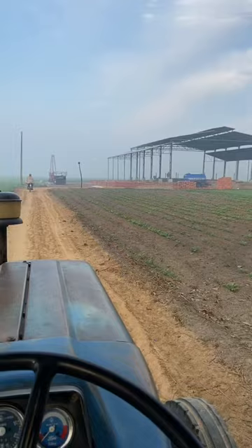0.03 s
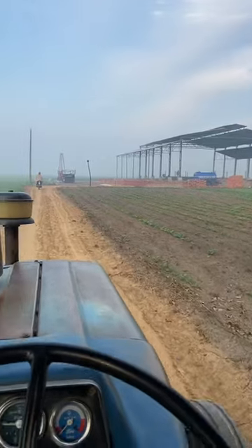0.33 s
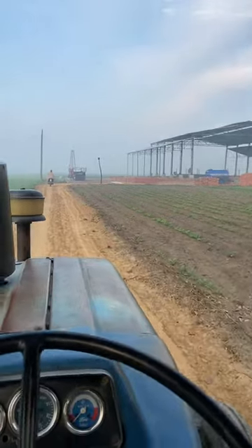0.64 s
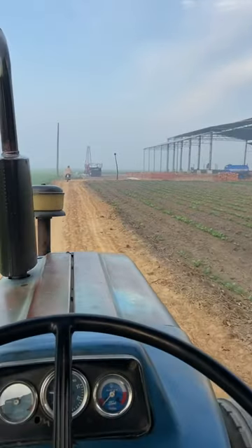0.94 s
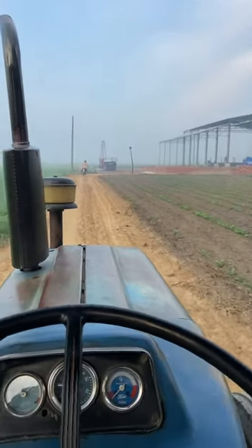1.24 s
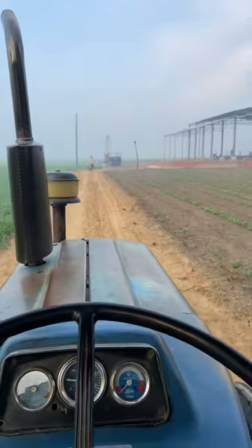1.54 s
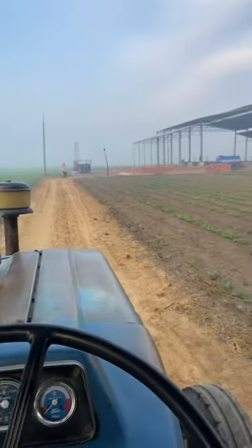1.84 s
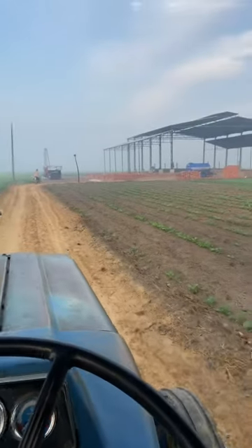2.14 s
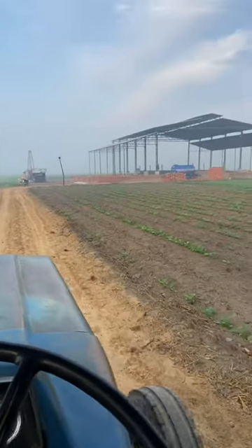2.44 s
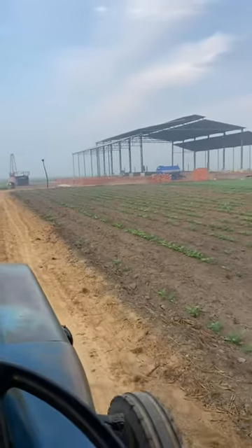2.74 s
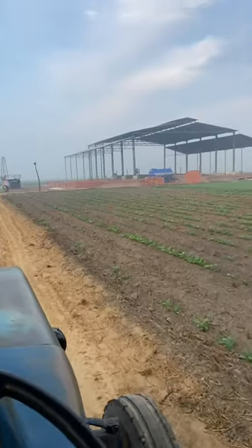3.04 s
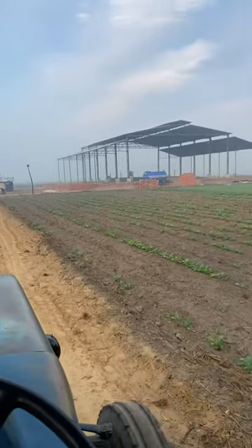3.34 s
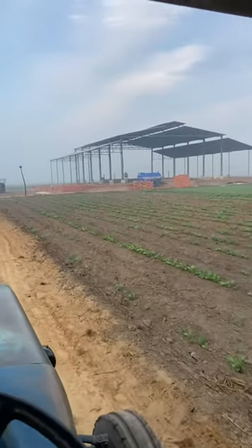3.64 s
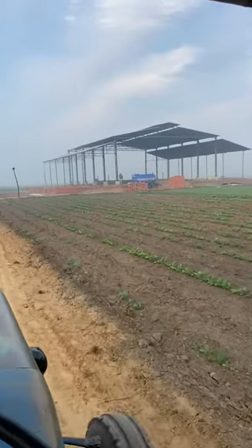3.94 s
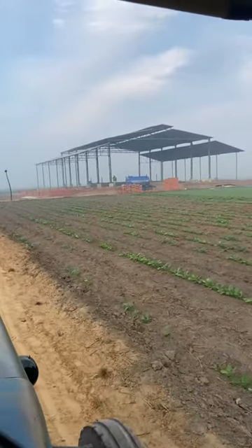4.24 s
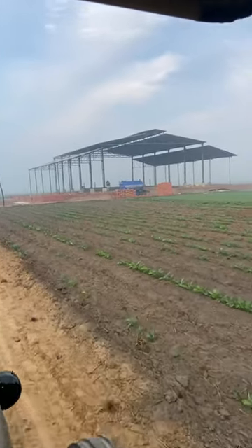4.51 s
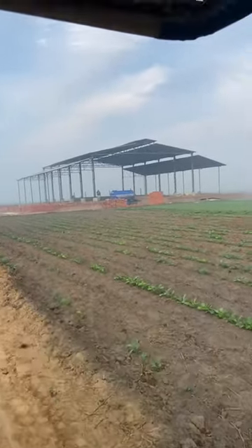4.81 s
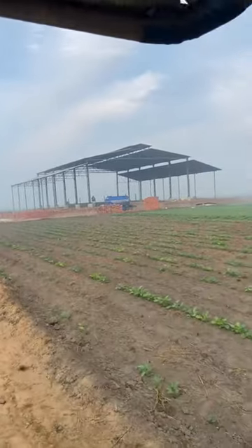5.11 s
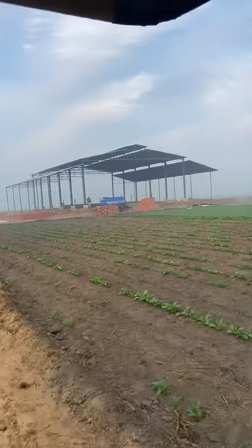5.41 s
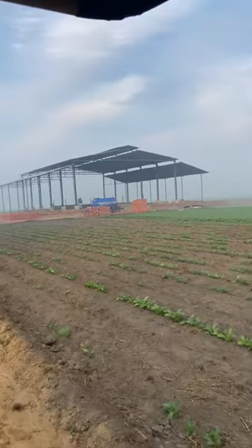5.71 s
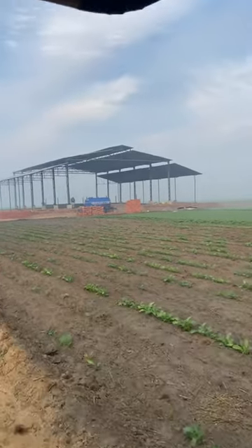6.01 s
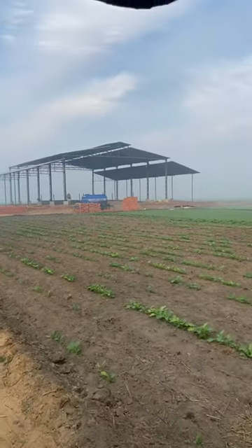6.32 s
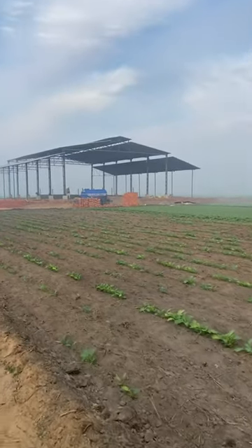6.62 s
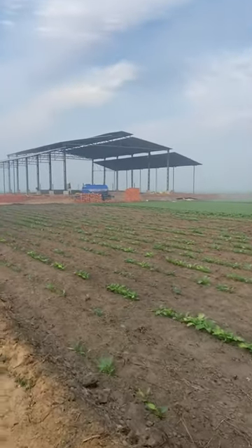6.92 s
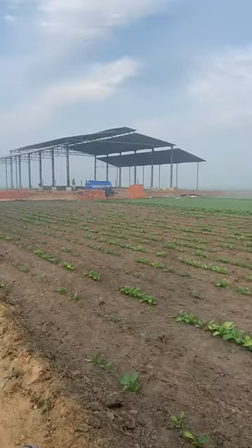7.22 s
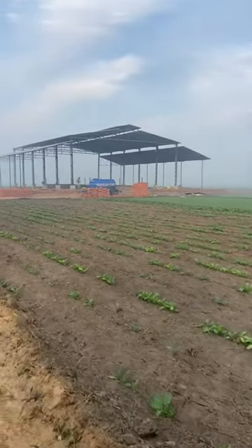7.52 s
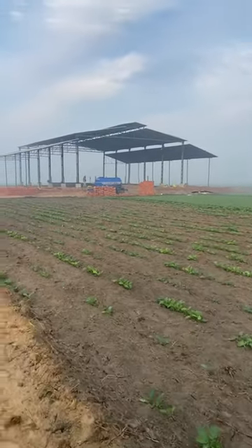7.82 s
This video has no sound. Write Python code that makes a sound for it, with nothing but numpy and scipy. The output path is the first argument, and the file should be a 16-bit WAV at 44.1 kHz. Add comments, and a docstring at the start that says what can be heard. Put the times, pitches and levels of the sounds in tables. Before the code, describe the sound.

A diesel tractor engine runs from start to finish, heard close up from the driver's seat. It holds a nearly constant speed, about twenty beats a second, with deep exhaust thumps, hard knocking and a low rumble from the bonnet and gearbox. Loose steel rattles and rings with the beats, and single knocks stand out. The bonnet booms a little more around 0.5 and 1.2 seconds, and a faint gear hum swells near 1.4 and 2.5 seconds. A dry joint squeaks faintly between 2 and 3 seconds. From about 3 to 5.5 seconds the tone gradually shifts: the rumble eases slightly, while sheet-metal chatter and a low throb come forward. More short, faint squeaks follow from about 6 to 7.5 seconds. Tiny high clinks of loose parts are scattered throughout, more often in the last two seconds.

```python
"""The thump and clatter of a three-cylinder diesel tractor at about 810 rpm, from the driver's seat.
Each firing is an impulse that excites resonators: the exhaust stack thumps, the block knocks and loose
steel rattles, while bonnet and gearbox rumble underneath. It hits harder under load, and single
firings stand out. Small parts clink and a dry joint squeaks now and then. The balance shifts as the
microphone slowly turns from the bonnet to the field."""
import sys
import numpy as np
from scipy import signal
from scipy.fft import rfft, irfft, next_fast_len
from scipy.io import wavfile
from scipy.ndimage import uniform_filter1d

SR = 44100
rng = np.random.default_rng(int(sys.argv[2]) if len(sys.argv) > 2 else 0)


def wav_record(signal):
    """Record a signal, one row per channel, as 16-bit PCM in the file named by sys.argv[1]."""
    frames = np.transpose(np.atleast_2d(signal))
    bounded = np.clip(frames, -1, 1)
    # unit amplitude maps onto the largest positive 16-bit level
    quanta = np.round(bounded * 32767).astype(np.int16)
    wavfile.write(sys.argv[1], SR, quanta)


N = 346626
TIME = np.arange(N) / SR
FFT_SIZE = next_fast_len(N + SR // 2, real=True) // 2 * 2
HZ = np.arange(FFT_SIZE // 2 + 1) * SR / FFT_SIZE
CYLINDERS = 3

# engine speed: (time [s], firing rate [1/s])
FIRING_RATE = [(0, 19.86), (.82, 20.35), (2.26, 20.23), (3.42, 19.86), (3.69, 20.36), (5.06, 20.55),
               (5.7, 20.16), (6.72, 19.87), (7.86, 20.26)]
# narrow resonances of the block: (frequency [Hz], bandwidth [Hz], level re the broad spectrum [dB])
BLOCK_RESONANCES = [(566, 18, -7), (748, 20, -2), (786, 16, -4), (910, 22, -5), (1005, 20, -8),
                    (1238, 18, -8), (1303, 30, -8), (1463, 12, 2), (1600, 16, -2), (2158, 27, -3),
                    (2289, 34, -3), (2799, 50, -8), (3700, 50, -6), (4037, 45, -2), (4916, 45, -2),
                    (5480, 55, -3)]


def firings(shared_db=.5, own_db=.6, skip_s=6.3, skip_rows=3):
    """Quasi-periodic excitation: the firing times, and the knock, rattle and clank level of each."""
    # two engine cycles, a row per firing: (knock [dB], rattle [dB], clank [dB])
    pattern = [(1, 2.45, 8), (-0.8, -2.4, -24), (0, 0.5, 0), (-3.5, -1, 1), (-4.5, -3, -22), (0.9, 1, 3.5)]
    # firings that knock or rattle louder: (time [s], extra knock and clank [dB], extra rattle [dB])
    hard_knocks = [(0.1, 3.0, 5.0), (0.15, 5.0, 5.5), (0.2, 2.5, 5.5), (0.55, 2.0, 1.5), (0.6, 2.5, 3.0),
                   (1.19, 3.0, 0.0), (1.48, 3.5, 0.0), (1.78, 1.5, 1.0), (1.88, 0.5, 2.5), (2.08, 1.5, 2.5),
                   (2.13, 2.5, 1.0), (2.18, 2.5, 1.5), (2.27, -1.0, 3.5), (2.32, 1.0, 2.5),
                   (2.52, 4.0, 5.0), (2.62, 2.0, 3.5), (2.77, 2.5, 2.5), (2.87, 4.0, 0.5), (3.02, 4.0, 2.5),
                   (3.17, -2.0, 3.0), (3.22, 3.5, 2.5), (3.32, 4.5, 3.0), (3.42, 0.0, 5.0),
                   (3.57, 1.0, 3.0), (3.87, 2.5, -1.0), (3.97, 1.0, 3.0), (4.01, 2.5, 1.0),
                   (4.26, 2.5, -2.0), (4.36, 4.0, 3.5), (4.75, -1.5, 3.5), (5.14, 2.0, 1.0),
                   (5.19, 2.0, 0.0), (5.33, 3.0, 2.5), (5.98, 2.5, 3.0), (6.18, 3.0, 3.0), (6.33, 2.0, 2.5),
                   (6.58, 2.5, 0.0), (6.68, 2.0, 2.5), (6.73, 2.5, 3.5), (6.98, 0.0, 5.0), (7.23, 2.0, 0.5),
                   (7.28, 1.5, 2.0), (7.53, 4.5, 0.0)]
    fired = np.cumsum(curve(FIRING_RATE)) / SR
    number = np.arange(1, int(fired[-1]) + 1)
    times = np.interp(number, fired, TIME)
    row = (number + skip_rows * (times > skip_s)) % len(pattern)  # the accents skip ahead once
    chance = rng.standard_normal((len(times), 3))
    extra_db = shared_db * chance[:, :1] + own_db * chance[:, 1:]
    for s, knock_db, rattle_db in hard_knocks:
        extra_db[np.argmin(abs(times - s))] = knock_db, rattle_db
    low_db, high_db = extra_db.T
    blow_db, jolt_db, clank_db = np.array(pattern)[row].T
    return times, blow_db + low_db, jolt_db + high_db, clank_db + low_db


def exhaust(times, spread_db=1.03, early_s=.0012, cutoff_hz=28):
    """Pipe resonance: each gas puff rings the stack, too narrow to radiate the firing rate well."""
    # response of the stack: (frequency [Hz], level [dB])
    stack = [(20, -24), (30, -14.5), (40, -10), (61, -0.5), (81, 0.5), (101, -13), (121, -13.5), (160, -18),
             (250, -21), (450, -31.5), (900, -49), (6000, -110)]
    puffs = pulses(times - early_s, spread_db * rng.standard_normal(len(times)))
    radiation = 1 / (1 + (cutoff_hz / (HZ + 1)) ** 6)
    return unit(through(puffs, response(stack) * radiation))


def rumble(times, shake_db=-3, decay_s=.072, surge_db=-1):
    """Forced vibration: each cylinder shakes the bonnet its own way, over churning gears and tyres."""
    # response of bonnet and gearbox: (frequency [Hz], level [dB])
    body = [(22, -63), (36, -29), (55, -3), (75, -2), (110, 2.5), (195, 1), (230, -4), (275, -1.5),
            (330, -4), (420, -4), (590, -7), (680, -16), (1200, -25), (4000, -70)]
    t = TIME[:SR // 10]
    shakes = 0
    for cylinder in range(CYLINDERS):
        own_times = times[cylinder::CYLINDERS]
        shake = rng.standard_normal((2, len(t))) * np.exp(-t / decay_s)
        kicks = pulses(own_times, rng.standard_normal(len(own_times)))
        shakes = shakes + signal.fftconvolve(kicks[None], shake)[:, :N]
    # the churn surges as the power stroke takes up the slack in the gears
    surge = bursts(times + .017, np.full(len(times), surge_db), rise_s=.006, decay_s=.008)
    churn = np.hypot(1, surge) * impacts(3000, .77)
    # everything slackens during the compression just before a firing
    slack = 1 - .6 * bursts(times - .013, np.zeros(len(times)), rise_s=.005, decay_s=.008)
    force = slack * (undb(shake_db) * unit(shakes) + churn)
    return unit(through(force, response(body, BLOCK_RESONANCES)))


def knock(times, db, slap_db=-1.5, valve_db=-7, gears_db=-3.8):
    """Structure-borne sound: combustion, piston slap, valves and timing gears strike the block."""
    # response of the block: (frequency [Hz], level [dB])
    block = [(120, -21.5), (300, 6.5), (560, -0.5), (660, 5), (780, 3), (950, 2), (1400, 0), (1850, -0.5),
             (2400, -3), (3300, -13), (4500, -12), (9000, -39.5)]
    blow = bursts(times - .0055, db, rise_s=.0068, decay_s=.012)
    slap = bursts(times + .009, db + slap_db, rise_s=.003, decay_s=.006)
    seating_db = valve_db + db + 2 * rng.standard_normal(len(times))
    valve = bursts(times + .021, seating_db, rise_s=.002, decay_s=.014)
    envelope = np.sqrt(blow ** 2 + slap ** 2 + valve ** 2 + undb(gears_db) ** 2)  # powers add
    force = envelope * cyclic_impacts(times, per_s=26000, share=.35)
    return unit(through(force, response(block, BLOCK_RESONANCES)))


def ring(times, db):
    """Free vibration: the block rings after each blow, with a mix of modes set by where it is struck."""
    # block modes: (frequency [Hz], bandwidth [Hz], level for cylinder 1, 2, 3 [dB])
    block_modes = [(374.5, 25.5, -3, -7, 8), (448, 11.8, -1, -6, 2.5), (512, 24, 1, -3, -3),
                   (594, 22, -3.5, -5, 0.5), (752.4, 22.6, 1.5, -8, 4), (777, 21, 1, -7, -7.5),
                   (840, 25, -11, 0.5, -1), (912.5, 13.4, 0.5, -17, -15), (1004.6, 17.6, -4.5, -7, -0.5),
                   (1067, 16.4, -3, -16, -3), (1182, 13, -8, -8, -2), (1244, 12.7, -0.5, -12, -7.5),
                   (1307, 15.7, -1, -9, -6), (1391, 17.3, 3, -9, -3.5), (1480, 18, 3.5, -5.5, -5.5),
                   (1596, 26, -1.5, -7, -3), (1885, 34, -6, 2, -0.5), (2165, 19, -24, 3, -6),
                   (2323, 27, -20, -7, 2.5)]
    return struck(times - .001, db, block_modes, rise_s=.0072, spread_db=2, spread_rad=.5)


def boom(times, hz=272, width_hz=70):
    """Panel resonance: the bonnet booms in the wake of each exhaust puff."""
    envelope = bursts(times + .012, np.zeros(len(times)), rise_s=.004, decay_s=.014)
    force = envelope * impacts(3000, 1.2)
    return unit(through(force, modes([(hz, width_hz, 0)]) ** 2))


def rattle(times, db, tick_db=-5, tappet_db=-9, chatter_db=-13):
    """Impact noise: injectors tick, jolted steel buzzes and one slack tappet clicks once a cycle."""
    # response of the loose steel: (frequency [Hz], level [dB])
    steel = [(800, -18), (2500, -7.5), (3400, -4.5), (3950, -4), (4300, -5.5), (5000, -1.5), (5900, -3.5),
             (6600, -6.5), (8000, -6), (9600, -7), (11000, -10), (13500, -10), (15500, -54)]
    times = times + .0005 * rng.standard_normal(len(times))
    jolt = bursts(times - .006, db, rise_s=.006, decay_s=.019)
    tick = bursts(times - .0045, tick_db + .5 * db, rise_s=.0015, decay_s=.006)
    click_times = times[::CYLINDERS] + .025
    click_db = tappet_db + 2 * rng.standard_normal(len(click_times))
    tappet = bursts(click_times, click_db, rise_s=.0059, decay_s=.018)
    chatter = np.sqrt(tick ** 2 + tappet ** 2 + undb(chatter_db) ** 2) * impacts(14000, .54)
    shaken = jolt * cyclic_impacts(times, per_s=15000, share=.2)
    buzz = through(shaken, lowpass(8500))  # the heavier parts carry less of the top octave
    return unit(through(buzz + chatter, response(steel, BLOCK_RESONANCES)))


def ping(times, db):
    """Free vibration: thin steel parts ring with every jolt, never quite the same way twice."""
    # thin steel modes: (frequency [Hz], bandwidth [Hz], level for cylinder 1, 2, 3 [dB])
    steel_modes = [(2810, 37, -3, -18, -1), (3750, 42, -7, -5, 3.5), (4037, 32, 1, -4, -2),
                   (4530, 47, -4, 7, -9), (4940, 26, 5, -6, -8), (5110, 52, 3, -9, -6),
                   (5220, 52, 2, -3, -3), (5270, 60, 1, -7, -3.5), (5500, 38, 1, -8, -6),
                   (5760, 37, 4, -13, -13), (6000, 44, 5, -13, -13)]
    return struck(times - .004, db, steel_modes, rise_s=.003, spread_db=4, spread_rad=1.2)


def clank(times, db):
    """Shell resonance: a hollow cover jumps on its seat, hardest every second cycle."""
    # cover modes: (frequency [Hz], bandwidth [Hz], level [dB])
    cover = [(860, 92, -2), (1083, 36, 10.5), (1215, 35, 10.5), (1285, 41, 11), (1412, 36, 3.5)]
    force = bursts(times + .001, db, rise_s=.003, decay_s=.012) * impacts(12000, .6)
    return unit(through(force, modes(cover) * lowpass(2200)))


def drone(per_firing=22.22, waver=.0071):
    """Gear-mesh tone: a gear pair hums at a multiple of engine speed, wavering with its backlash."""
    backlash = unit(uniform_filter1d(rng.standard_normal(N), size=2000))
    hz = per_firing * curve(FIRING_RATE) * (1 + waver * backlash)
    return unit(np.sin(2 * np.pi * np.cumsum(hz) / SR))


def throb(times, late_s=.02, spread_db=3.5):
    """Sympathetic vibration: the wheel guard beside the seat throbs after each puff."""
    # wheel guard modes: (frequency [Hz], bandwidth [Hz], level [dB])
    guard = [(189, 16, 4), (370, 29, -7.5)]
    kick_times = times + late_s + .0009 * rng.standard_normal(len(times))
    kicks = pulses(kick_times, spread_db * rng.standard_normal(len(times)))
    highpass = HZ ** 4 / (HZ ** 4 + 140 ** 4)
    return unit(through(kicks, modes(guard) * lowpass(500) * highpass))


def panel(hz=2650, width_hz=1100, hits_per_s=125):
    """Random excitation: a loose sheet-metal panel chatters out of step with the engine."""
    when, strength = rng.random((int(hits_per_s * N / SR), 2)).T
    envelope = bursts(when * N / SR, 3 * np.log(strength + 1e-9), rise_s=.001, decay_s=.012)
    force = envelope * impacts(9000, .49)
    return unit(through(force, modes([(hz, width_hz, 0)]) ** 2))


def clinks():
    """Impact excitation: small loose parts jump and land, briefly sounding their high modes."""
    # landings: (time [s], level [dB])
    landings = [(.70, -35), (1.19, -32), (2.47, -44), (2.917, -30), (3.42, -52), (3.575, -44), (3.667, -41),
                (4.402, -36), (5.824, -38), (5.875, -31), (6.172, -37), (6.327, -37), (6.827, -31),
                (6.927, -29), (7.524, -28.5)]
    # modes of the small parts: (frequency [Hz], bandwidth [Hz], level [dB])
    small_parts = [(8100, 540, 8), (9400, 300, -9), (10740, 700, 2), (12100, 600, -7)]
    times, db = np.transpose(landings)
    bandpass = 1 / (1 + (7000 / (HZ + 1)) ** 8 + (HZ / 13500) ** 16)
    jingle = unit(through(impacts(4600, 1.5), modes(small_parts) * bandpass))
    return bursts(times, db, rise_s=.0004, decay_s=.01) * jingle


def squeaks(waver=.00475, overtone_db=-25):
    """Stick-slip friction: a dry joint chirps; the rougher chirps scrape more than they sing."""
    # (time [s], length [s], start pitch [Hz], end pitch [Hz], level [dB], roughness [0-1])
    chirps = [(2.07, .05, 1400, 1540, -31, .5), (2.10, .06, 1600, 1640, -31, .5),
              (2.79, .12, 1470, 1530, -30, .5), (2.96, .09, 1730, 1630, -25.5, .7),
              (6.14, .125, 1608, 1602, -24, .36), (6.655, .095, 1612, 1602, -23.5, .36),
              (7.07, .09, 1630, 1605, -26.5, .45), (7.12, .14, 1610, 1595, -29.5, .42),
              (7.41, .09, 1725, 1780, -31, .6), (7.495, .06, 1595, 1615, -27, .35)]
    out = np.zeros(N)
    slow_noise = uniform_filter1d(rng.standard_normal((3, N)), size=200)
    slip, grip, scrape = unit(uniform_filter1d(slow_noise, size=100))
    for s, length, start_hz, end_hz, db, rough in chirps:
        along = np.clip((TIME - s) / length, 0, 1)
        hz = (start_hz + (end_hz - start_hz) * along) * (1 + waver * slip)
        swing = np.exp(2j * np.pi * np.cumsum(hz) / SR)
        tone = swing + undb(overtone_db) * swing ** 3
        contact = np.sqrt(2 * (1 - rough ** 2)) + rough * (grip + 1j * scrape)
        out += undb(db) * np.sin(np.pi * along) * np.real(contact * tone)
    return out


def heard(part, set_rate=20.2, droop=.35):
    """Directivity and load: a part's gain follows the microphone's aim, engine pull and any swells."""
    # {part: (level facing the bonnet [dB], added facing the field [dB], added per unit load [dB])}
    levels = {"exhaust": (-18.5, -2.15, 0.85), "rumble": (-21.5, -2.5, 0.21), "boom": (-25.5, -16, 0),
              "drone": (-33.5, -12, 0), "knock": (-24, -1.56, 0.15), "ring": (-27, -1.26, 0.59),
              "clank": (-37.5, -2.1, -0.2), "rattle": (-33.5, 3.34, 0), "ping": (-40, 1.2, 1),
              "panel": (-42.5, 8.7, -0.23), "throb": (-52, 21.6, 0)}
    # aim of the microphone: (time [s], turn [0 bonnet, 1 field])
    turn = [(0, 0.21), (1.3, 0.27), (2.4, 0.28), (4.0, 0.61), (5.5, 0.84), (7.86, 0.88)]
    # passing swells: (part, peak time [s], half length [s], extra level [dB])
    swells = [("boom", 0.56, 0.07, 10.4), ("boom", 1.22, 0.17, 7.3), ("boom", 4.3, 0.75, 6),
              ("drone", 1.36, 0.25, 5.1), ("drone", 2.56, 0.27, 5.7), ("clank", 1.4, 0.28, 3.5),
              ("clank", 3.8, 0.37, 2.1), ("panel", 2.6, 0.083, 8.3), ("panel", 5.14, 0.11, 6.8)]
    facing_db, turned_db, load_db = levels[part]
    load = (set_rate - curve(FIRING_RATE)) / droop  # the governor adds fuel as the engine sags
    swell_db = sum(db * np.exp(-((TIME - s) / half_s) ** 2)
                   for name, s, half_s, db in swells if name == part)
    return undb(facing_db + turned_db * curve(turn) + load_db * load + swell_db)


def stereo_image(direct, diffuse):
    """Stereo image: phase and level differences between left and right vary with frequency."""
    # phase difference: (frequency [Hz], lead of the left channel [rad])
    lead = [(100, 0), (750, .5), (1700, -.1), (2600, .9), (4300, .85), (5100, .15), (5800, 1.2),
            (6600, 2.9), (8000, 3.4), (9700, 6.1), (11500, 6.5), (12500, 9.3), (14800, 9.6), (15500, 12.3)]
    # level difference: (frequency [Hz], left minus right [dB])
    balance = [(60, -0.5), (110, -1.5), (200, -2), (400, -4.5), (650, -1), (1000, 2), (1700, -2.5),
               (2300, -0.5), (3400, -1), (4400, -2.5), (5000, 0), (7000, -0.5)]
    # stereo width, by turns wide and narrow in the treble: (frequency [Hz], diffuse re direct [dB])
    width = [(60, -42), (250, -24), (570, -9), (1900, -10.5), (2900, -6), (5200, -13), (6300, -1),
             (7200, -35), (8900, 2), (10300, -34), (12000, -7), (13500, -24)]
    ratio, tilt = undb(over_hz(width)), undb(over_hz(balance) / 2)
    mid = through(direct, 1 / np.hypot(1, ratio))
    side = through(diffuse, ratio / np.hypot(1, ratio))
    left_right = np.array([tilt, np.exp(-1j * over_hz(lead)) / tilt])
    return through(np.array([mid + side, mid - side]), left_right)


def struck(times, db, table, rise_s, spread_db, spread_rad):
    """Modal superposition: damped modes ring after each firing, alike for the same cylinder."""
    table, t = np.array(table), TIME[:SR // 8]
    hz, width_hz = table[:, :1], table[:, 1:2]
    rings = np.exp((2j * hz - width_hz) * np.pi * t) * (1 - np.exp(-(t / rise_s) ** 2))
    contact = rng.uniform(-np.pi, np.pi, (CYLINDERS, 2, len(table)))
    chance = rng.standard_normal((len(times), 2, 2, len(table)))
    out = np.zeros((2, N + len(t)))
    for k, at in enumerate(np.clip(times * SR, 0, N).astype(int)):
        cylinder = (k + 1) % CYLINDERS
        size = undb(db[k] + table[:, 2 + cylinder] + spread_db * chance[k, 0])
        phase = contact[cylinder] + spread_rad * chance[k, 1]
        out[:, at:at + len(t)] += np.real(size * np.exp(1j * phase) @ rings)
    return unit(out[:, :N])


def impacts(per_s, spread_db):
    """Shot noise: dense tiny impacts of uneven size; row 0 is the direct sound, row 1 the diffuse."""
    size = undb(spread_db * np.minimum(rng.exponential(size=(2, N)), 4))
    return unit(rng.standard_normal((2, N)) * size * (rng.random((2, N)) < per_s / SR))


def cyclic_impacts(times, per_s, share):
    """Cyclostationary noise: a share of the impacts' power repeats whenever the same cylinder fires."""
    length = SR // 10
    per_cylinder = impacts(per_s, .41)[:, :CYLINDERS * length].reshape(2, CYLINDERS, -1)
    starts = np.append(0, (times - .007) * SR).astype(int)
    firing = np.searchsorted(starts, np.arange(N), side="right") - 1
    repeating = per_cylinder[:, firing % CYLINDERS, (np.arange(N) - starts[firing]) % length]
    return np.sqrt(share) * repeating + np.sqrt(1 - share) * impacts(per_s, .85)


def pulses(times, db):
    """Impulse train: one pulse of the given level at each time."""
    out, at = np.zeros(N), np.round(times * SR).astype(int)
    inside = (at >= 0) & (at < N)
    out[at[inside]] = undb(db)[inside]
    return out


def bursts(times, db, rise_s, decay_s):
    """Exponential decay: an envelope that swells and dies after each time, with peak 1 at 0 dB."""
    t = TIME[:SR // 5]
    shape = (1 - np.exp(-(t / rise_s) ** 2)) * np.exp(-t / decay_s)
    return signal.fftconvolve(pulses(times, db), shape / shape.max())[:N]


def response(spectrum, resonances=()):
    """Minimum-phase response of a body: a broad spectrum with narrow resonances on top."""
    cepstrum = irfft(np.log(undb(over_hz(spectrum))))
    cepstrum[1:FFT_SIZE // 2] *= 2
    cepstrum[FFT_SIZE // 2 + 1:] = 0
    peaks = sum(undb(db) / (1 + 2j * (HZ - hz) / width) for hz, width, db in resonances)
    return np.exp(rfft(cepstrum)) * (1 + peaks)


def modes(table):
    """Frequency response of damped resonators in parallel."""
    return sum(undb(db) / (1 + 1j * (HZ / hz - hz / (HZ + 1)) * hz / width) for hz, width, db in table)


def lowpass(hz):
    """Fourth-order roll-off above a frequency."""
    return 1 / (1 + (HZ / hz) ** 4)


def through(x, gain):
    """Linear filtering by a frequency response."""
    return irfft(rfft(x, FFT_SIZE) * gain, FFT_SIZE)[..., :N]


def over_hz(points):
    """Interpolate (frequency [Hz], value) on a logarithmic axis."""
    hz, value = np.transpose(points)
    return np.interp(np.log(HZ + 1), np.log(hz), value)


def curve(points):
    """Interpolate (time [s], value)."""
    return np.interp(TIME, *np.transpose(points))


def undb(db):
    """Decibels to gain."""
    return 10 ** (np.asarray(db) / 20)


def unit(x):
    """Scale to rms 1."""
    return x / np.sqrt(np.mean(x ** 2))


def scene():
    """Superposition: the engine's parts share one timing; panel, clinks and joint go their own way."""
    times, blow_db, jolt_db, clank_db = firings()
    body = heard("rumble") * rumble(times) + heard("boom") * boom(times)
    block = heard("knock") * knock(times, blow_db) + heard("ring") * ring(times, blow_db)
    cover = heard("clank") * clank(times, clank_db)
    steel = heard("rattle") * rattle(times, jolt_db) + heard("ping") * ping(times, jolt_db)
    direct, diffuse = body + block + cover + steel + heard("panel") * panel() + clinks()
    thumps = heard("exhaust") * exhaust(times) + heard("throb") * throb(times)
    tones = heard("drone") * drone() + squeaks()
    return stereo_image(direct + thumps + tones, diffuse)


def record(dry, start_s=.035, top_hz=15800):
    """Saturation and band limiting: the microphone opens late, rounds the peaks and cuts the top."""
    rounded = np.tanh(.64 * dry) / .58
    top_cut = signal.ellip(10, .2, 80, top_hz, fs=SR, output="sos")
    return signal.sosfilt(top_cut, rounded * (TIME > start_s))


dry = scene()
out = record(dry)
wav_record(out)
```